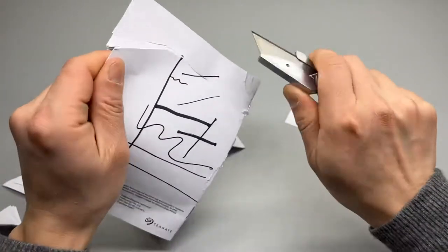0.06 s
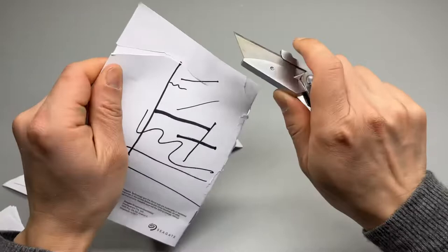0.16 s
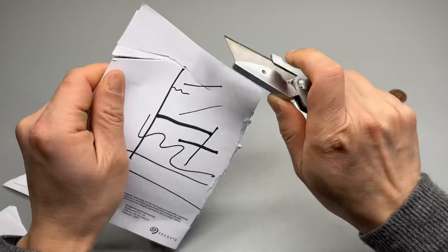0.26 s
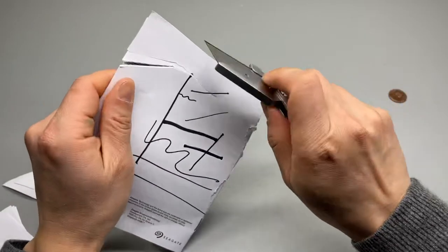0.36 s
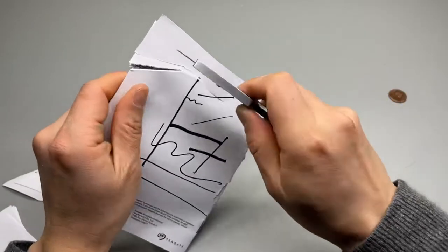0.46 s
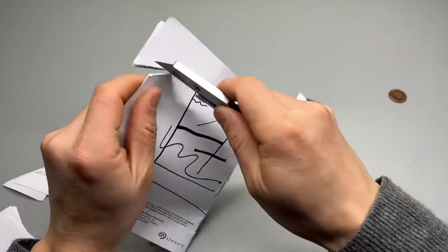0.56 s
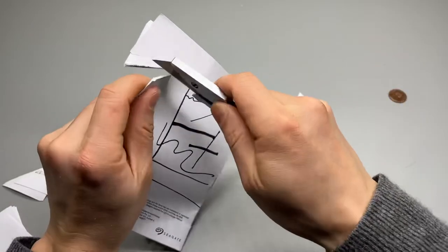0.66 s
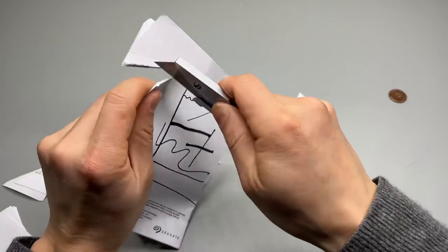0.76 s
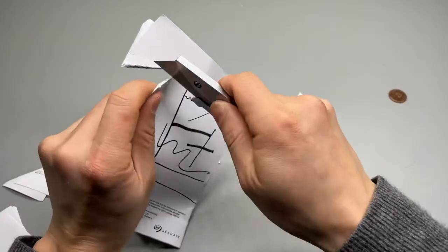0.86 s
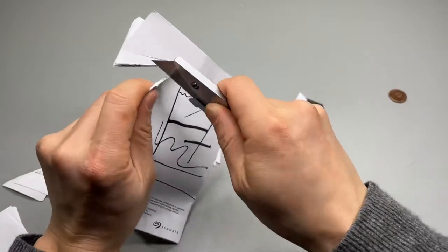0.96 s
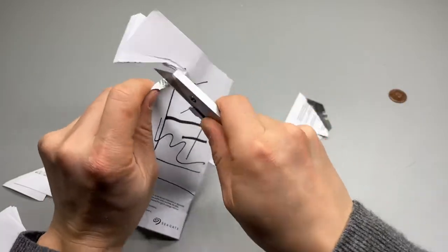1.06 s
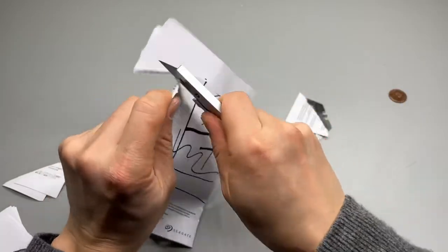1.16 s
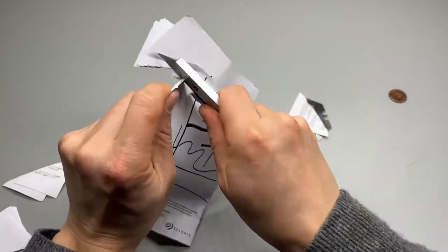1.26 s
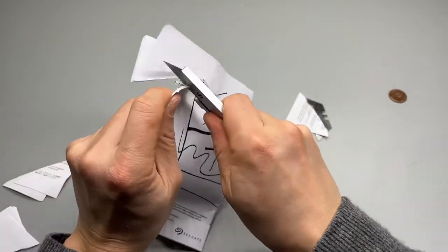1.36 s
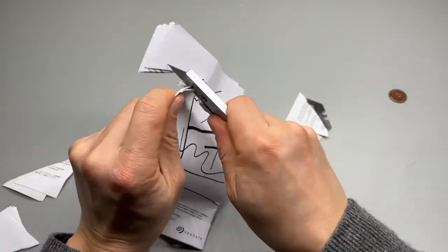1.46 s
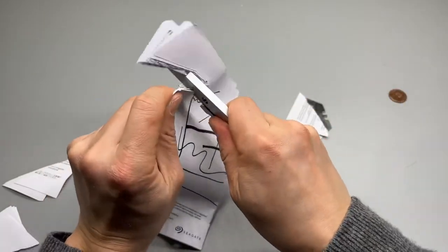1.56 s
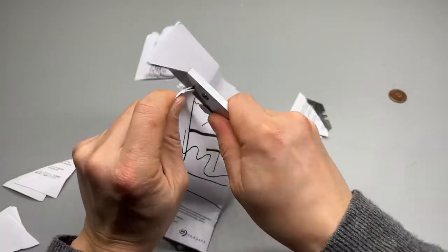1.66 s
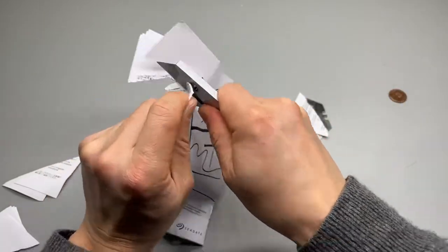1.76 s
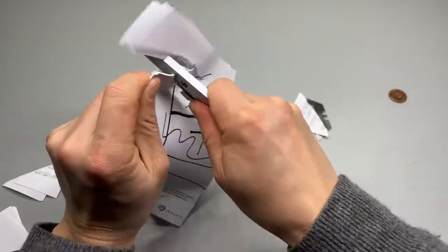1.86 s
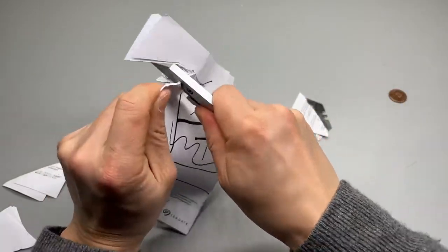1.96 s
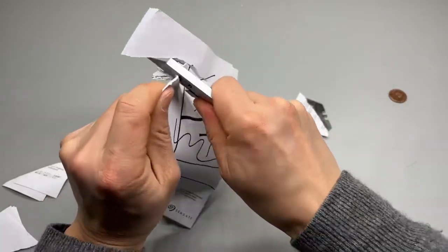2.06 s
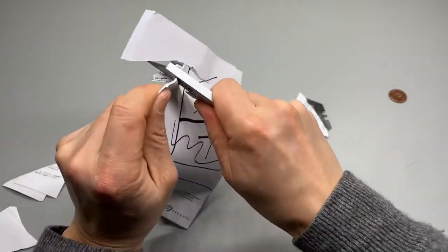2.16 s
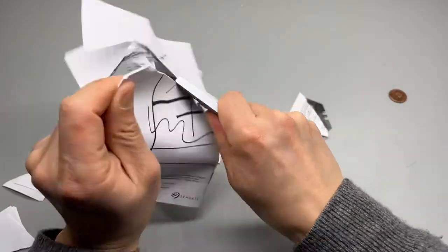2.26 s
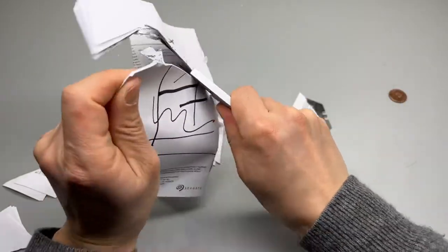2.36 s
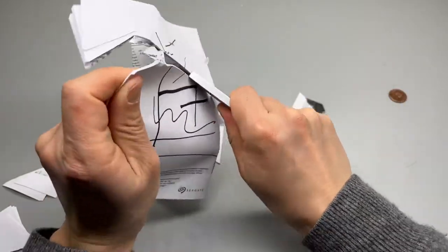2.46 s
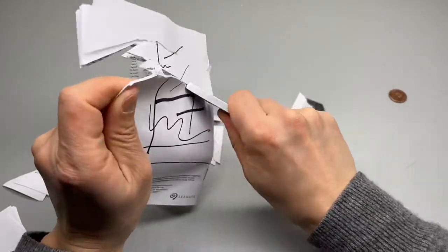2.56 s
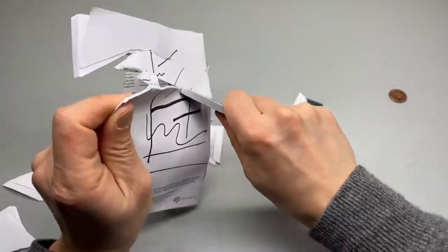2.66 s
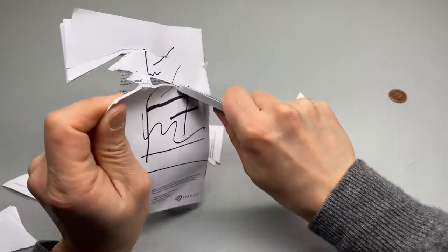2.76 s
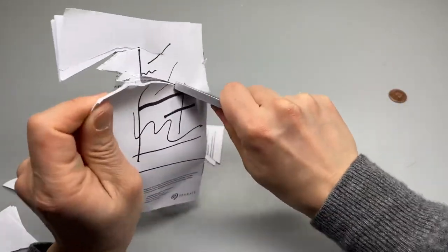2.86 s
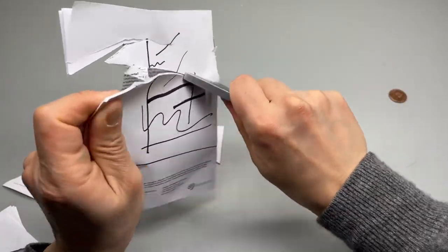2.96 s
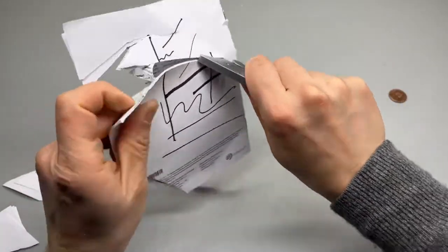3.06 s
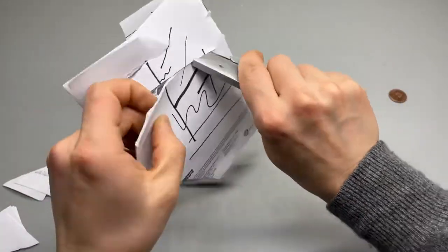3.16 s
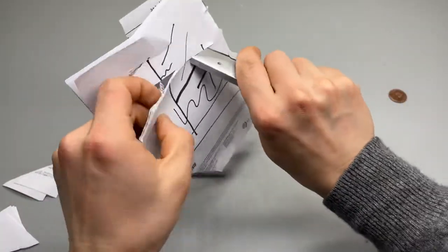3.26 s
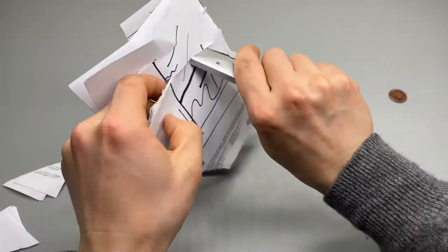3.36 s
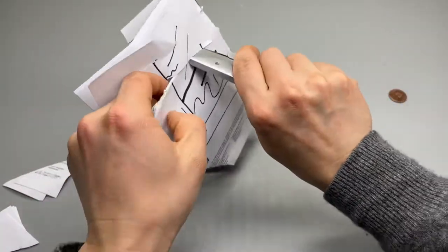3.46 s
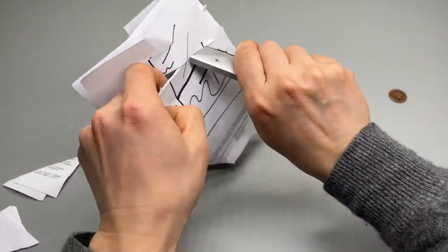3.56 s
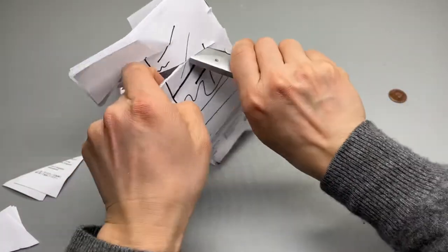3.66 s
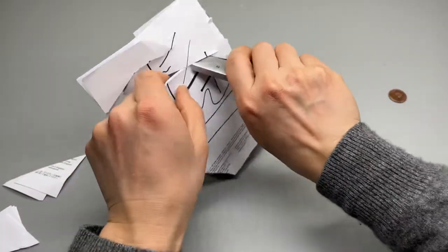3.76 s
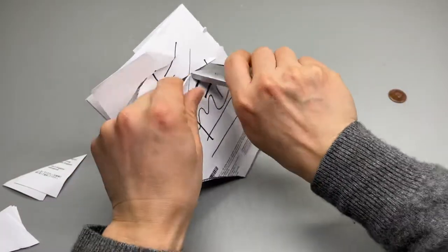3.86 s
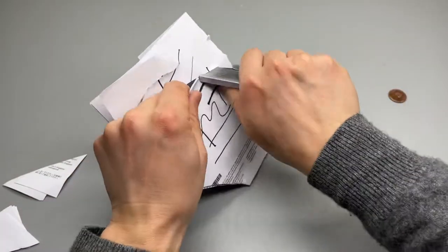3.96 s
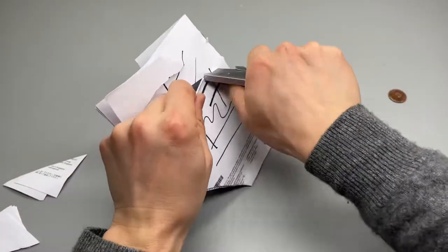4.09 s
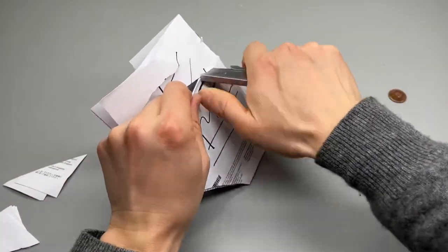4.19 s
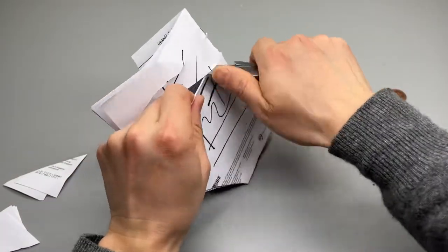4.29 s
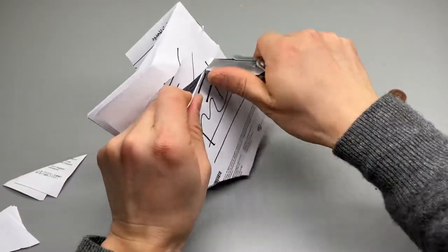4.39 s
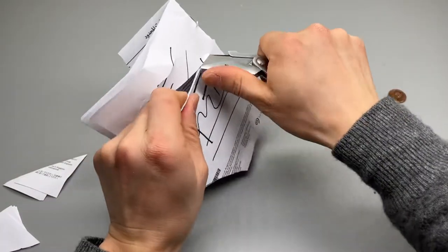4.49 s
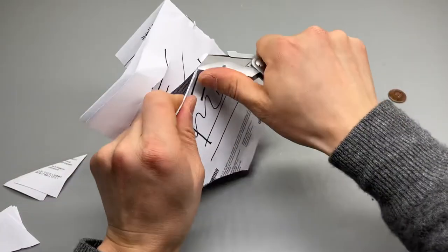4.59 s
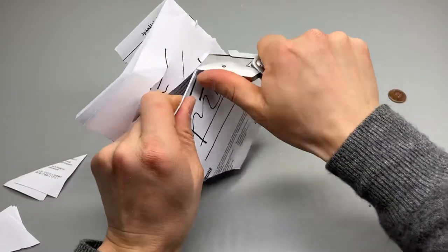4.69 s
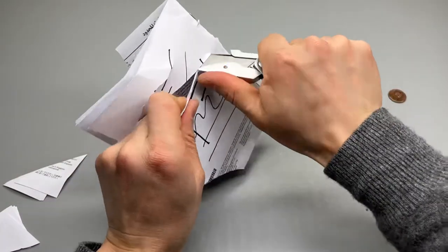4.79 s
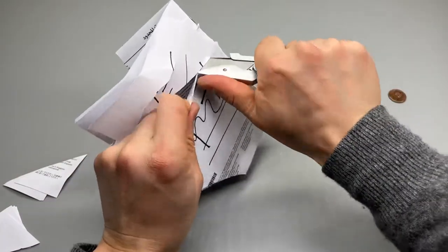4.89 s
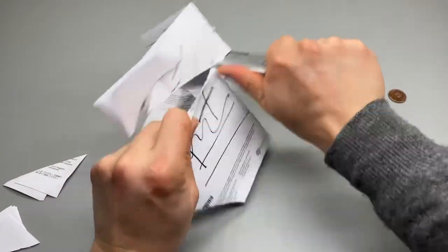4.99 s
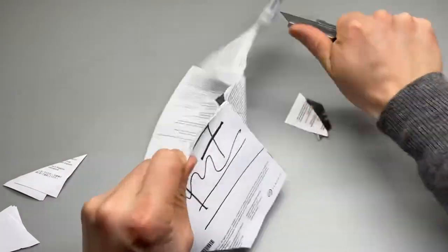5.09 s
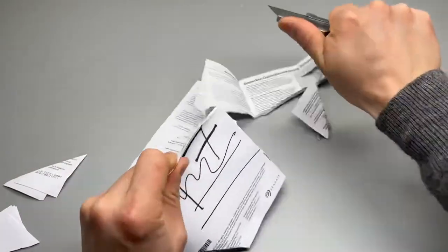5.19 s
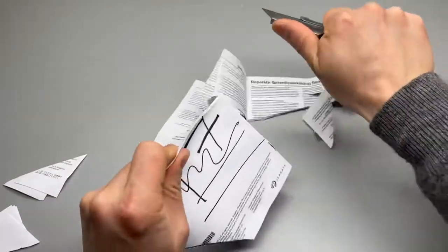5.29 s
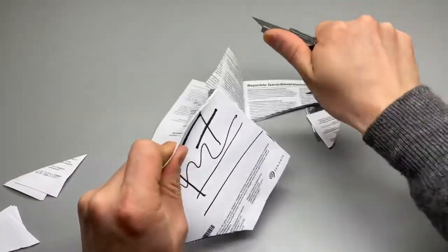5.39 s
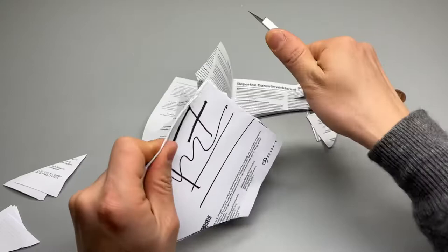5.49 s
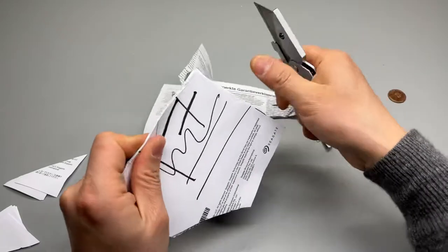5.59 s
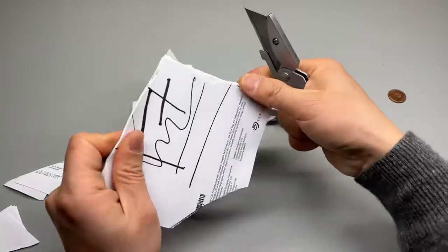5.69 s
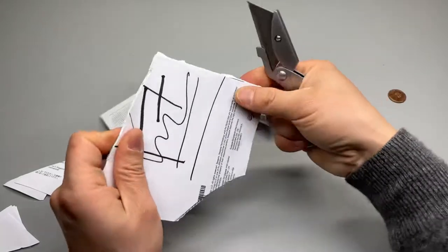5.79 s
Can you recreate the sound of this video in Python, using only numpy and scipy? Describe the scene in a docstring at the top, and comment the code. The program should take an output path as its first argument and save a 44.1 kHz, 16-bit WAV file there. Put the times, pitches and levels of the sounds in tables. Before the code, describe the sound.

A small quiet room, recorded close and in mono, with low rumble underneath. For the first second there are only very soft paper rubs, tiny ticks and dull knocks, while a faint far motor hum glides upward and disappears by about 1.7 s. At 1.1 s a short crisp slit sounds, then two or three more at 1.65 to 1.85 s with light rustling. Around 2.2 s a much stronger, bright crackling cut rips through, with sharp snaps at 2.2 and 2.3 s; a smaller snap and papery pop follow at 2.64 s. From 2.8 to 4.3 s the blade and fingers rub the sheets: hissy slides, crinkles, scattered ticks. It quietens until 4.9 s. At 5.0 s comes the loudest tear, a full-bodied rip with snaps and a soft flap of air, then another snap at 5.16 s. Brief rustles and faint handling ticks finish by 5.8 s.

```python
"""A small quiet room: a utility knife slits folded paper held over a table, close to the microphone.
Each stroke is a burst of random fibre breaks, coloured by a spectrum; between strokes blade and fingers rub
the sheets as hiss and rustle. Damped noise pulses give creases that tick and a sheet that pops dully or snaps.
The last strokes, near 5 s, are the strongest, as the strip comes free. A far motor, a gliding sine, hums
faintly at the start over low room rumble."""
import sys
import numpy as np
from scipy import signal
from scipy.fft import rfft, irfft
from scipy.io import wavfile
from scipy.ndimage import uniform_filter1d

SR = 44100
rng = np.random.default_rng(int(sys.argv[2]) if len(sys.argv) > 2 else 0)


def master_out(mix):
    """Clip the mix to full scale and print it as 16-bit PCM to the path in sys.argv[1]."""
    frames = np.transpose(np.atleast_2d(mix))
    ceiling = np.clip(frames, -1, 1)
    pcm = np.round(ceiling * 32767).astype(np.int16)
    wavfile.write(sys.argv[1], SR, pcm)


N = 257544

TIME = np.arange(N) / SR
FREQ = np.maximum(np.arange(N // 2 + 1) * SR / N, 1)


def undb(db):
    """Decibels to gain."""
    return 10 ** (np.asarray(db) / 20)


def unit(x):
    """Scale to rms 1."""
    return x / np.sqrt(np.mean(x ** 2))


def colour(x, points):
    """Give x a spectrum of (Hz, dB) points with a causal minimum-phase response; rms 1."""
    hz, db = np.transpose(points)
    log_gain = np.log(undb(np.interp(np.log(FREQ), np.log(hz), db)))
    cepstrum = irfft(log_gain, N)
    # fold onto positive time: minimum phase
    cepstrum[1:N // 2] *= 2
    cepstrum[N // 2 + 1:] = 0
    response = np.exp(rfft(cepstrum))
    return unit(irfft(rfft(x) * response, N))


def resonate(x, hz, width_hz):
    """Two-pole resonance, gain 1 at the centre."""
    w = 2 * np.pi * hz / SR
    a = np.sin(w) * width_hz / hz / 2
    return signal.lfilter([a, 0, -a], [1 + a, -2 * np.cos(w), 1 - a], x)


def resonate_twice(x, hz, width_hz):
    """Two equal resonances in series: steeper skirts."""
    return resonate(resonate(x, hz, width_hz), hz, width_hz)


def ring(x, modes):
    """Add resonances of (Hz, width Hz, dB) to x."""
    return x + sum(undb(db) * resonate(x, hz, width_hz) for hz, width_hz, db in modes)


def walk(rate_hz):
    """Smooth random wander, rms 1."""
    hold = int(SR / rate_hz)
    steps = rng.standard_normal(N)[np.arange(N) // hold]
    return unit(uniform_filter1d(steps, hold))


def grains(rate_hz, spread_db):
    """Random tiny breaks of either sign, rate_hz a second; most small, a few large; rms 1."""
    size = undb(spread_db * np.minimum(rng.exponential(size=N), 4))
    happens = rng.random(N) < rate_hz / SR
    return unit(happens * size * rng.choice([-1, 1], N))


def crinkles(rate_hz, spread_db, width, count=12):
    """Tiny facets of the paper flip at random; each rings a few cycles at one of `count` pitches."""
    pitches_hz = np.geomspace(600, 14000, count)
    power_shares = pitches_hz / pitches_hz.sum()
    total = np.zeros(N)
    for hz, share in zip(pitches_hz, power_shares):
        flips = grains(rate_hz / count, spread_db)
        total += np.sqrt(share) * unit(resonate(flips, hz, width * hz))
    return unit(total)


def room_tone():
    """Low rumble of the room under a trace of hiss: coloured noise."""
    # spectrum: (frequency [Hz], density [dB])
    tone_spectrum = [(20, -54), (38, -27), (52, -3), (90, 0), (125, 1), (180, -12.5), (400, -17),
                     (1200, -88), (16000, -66)]
    # rumble in the room: (time [s], level [dB])
    rumble = [(0, -66.5), (1.5, -64), (4.4, -69.5), (5.84, -66)]
    level_db = np.interp(TIME, *np.transpose(rumble))
    return colour(rng.standard_normal(N), tone_spectrum) * undb(level_db)


def motor(waver_db):
    """A far motor runs up and fades: a sine that climbs in pitch and wavers in level."""
    # run-up: (time [s], pitch [Hz], level [dB])
    run_up = [(0, 76.1, -72), (.4, 88.8, -66.5), (1.3, 107.7, -64), (1.7, 114, -97)]
    times, hz, db = np.transpose(run_up)
    phase = 2 * np.pi * np.cumsum(np.interp(TIME, times, hz)) / SR
    level_db = np.interp(TIME, times, db) + waver_db * walk(14)
    return unit(np.sin(phase)) * undb(level_db)


def flapping(swell_s, width):
    """The released sheet swings and fans the air: uneven low swings that swell and die quickly."""
    # swings: (start [s], level [dB], centre [Hz])
    flaps = [(1.134, -48, 123), (1.836, -48, 162), (2.206, -49, 84), (2.301, -52.5, 86), (2.637, -41, 119),
             (4.997, -29, 235), (5.005, -45, 163), (5.155, -39, 90), (5.159, -42, 256)]
    out = np.zeros(N + SR)
    t = TIME[:SR // 6]
    shape = t / swell_s * np.exp(1 - t / swell_s)
    shape_rms = np.sqrt(np.mean(shape ** 2))
    for start_s, db, hz in flaps:
        swing = resonate_twice(rng.standard_normal(len(t)), hz, width * hz) * shape
        start = int(start_s * SR)
        out[start:start + len(t)] += undb(db) * unit(swing) * shape_rms
    return out[:N]


def slide(peak_s, length_s):
    """Gain of one slide: it speeds up and slows down in a smooth bell."""
    rise_share = 0.44  # part of the slide spent speeding up
    side_s = length_s * np.where(TIME < peak_s, rise_share, 1 - rise_share)
    return np.exp(-((TIME - peak_s) / side_s) ** 2)


def bending(x, patchy_db, rate_hz, count=14):
    """As the paper bends, each half octave swells and fades by itself."""
    place = np.interp(np.log(FREQ), np.log([200, 14000]), [0, count - 1])
    spectrum = rfft(x)
    knots = np.arange(0, TIME[-1] + 1, 1 / rate_hz)
    out = np.zeros(N)
    for k in range(count):
        gain = np.interp(TIME, knots, undb(patchy_db * rng.standard_normal(len(knots))))
        band = irfft(spectrum * np.maximum(1 - abs(place - k), 0), N)
        out += gain * band
    return out


def rubbing():
    """Rough paper sticks and slips: fine hiss, stray crinkles and a lower rustle as the sheet bends."""
    # steady rub of the grip: (time [s], hiss level [dB], flexing level [dB])
    grip = [(0, -65, -84), (.2, -61, -78.5), (.52, -66, -77), (.6, -56.5, -56.5), (.88, -61, -92),
            (1.21, -56.5, -55), (1.5, -58, -83), (1.74, -43.5, -48), (2.07, -60.5, -66),
            (2.291, -49, -45.5), (2.76, -66, -75), (3.3, -52, -52.5), (3.48, -50.5, -61.5),
            (3.76, -45.5, -50), (4.359, -67.5, -78), (4.6, -56.5, -63.5), (4.86, -57, -74),
            (5.14, -38, -38), (5.36, -65, -64.5), (5.469, -55, -83), (5.601, -53.5, -63)]
    # single slides of blade or fingers: (fastest at [s], length [s], hiss level [dB], flexing level [dB])
    slides = [(.005, 0.032, -55, -79), (0.086, 0.044, -53.5, -87), (0.362, 0.036, -58.5, -56.5),
              (0.739, 0.043, -61.5, -56.5), (0.949, 0.069, -56, -49), (1.051, 0.072, -53, -52.5),
              (1.33, 0.11, -50, -49), (1.383, 0.025, -44, -49.5), (1.629, 0.11, -58, -50),
              (1.89, 0.08, -48, -47), (1.991, 0.059, -44.5, -53.5), (2.106, 0.038, -50, -59.5),
              (2.522, 0.068, -44, -45.5), (2.623, 0.2, -47, -49), (2.804, 0.049, -49.5, -49.5),
              (2.876, 0.077, -50.5, -50.5), (2.933, 0.035, -41, -42), (2.983, 0.14, -47, -47.5),
              (3.08, 0.07, -43.5, -77), (3.181, 0.11, -44, -53), (3.264, 0.018, -55, -43.5),
              (3.295, 0.045, -43.5, -71), (3.57, 0.091, -41, -59.5), (3.63, 0.031, -42, -62),
              (3.878, 0.032, -48, -47), (3.962, 0.095, -42.5, -47.5), (4.022, 0.048, -49, -47.5),
              (4.123, 0.065, -47.5, -49.5), (4.222, 0.15, -56, -57.5), (4.4, 0.02, -56, -83),
              (4.688, 0.12, -50, -56.5), (5.223, 0.016, -32.5, -53), (5.505, 0.03, -45.5, -62),
              (5.818, 0.027, -39, -52)]
    # spectra: (frequency [Hz], density [dB])
    hiss_spectrum = [(400, -17.5), (1300, -8), (2100, 2), (3200, 1), (5000, 2), (9000, 2), (12000, -4.5),
                     (16000, -6.5)]
    flex_spectrum = [(40, -10), (110, 1.5), (200, -0.5), (450, 1.5), (1000, -2), (1600, -2.5), (3000, -4.5),
                     (9000, -26)]
    times, grip_hiss_db, grip_flex_db = np.transpose(grip)
    hiss_gain = undb(np.interp(TIME, times, grip_hiss_db))
    flex_gain = undb(np.interp(TIME, times, grip_flex_db))
    for peak_s, length_s, hiss_db, flex_db in slides:
        speed = slide(peak_s, length_s)
        hiss_gain = np.hypot(hiss_gain, undb(hiss_db) * speed)
        flex_gain = np.hypot(flex_gain, undb(flex_db) * speed)
    slip = undb(1.6 * walk(130))
    facets = crinkles(rate_hz=1100, spread_db=2.0, width=0.25) * undb(-3.5)
    hiss = colour(grains(14000, 1.4) + facets, hiss_spectrum)
    flex = colour(grains(2500, 4.8) + facets, flex_spectrum)
    rub = (hiss * hiss_gain + flex * flex_gain) * slip
    return bending(rub, patchy_db=2.2, rate_hz=40)


def buckles(events, rattle, rattle_s, thump_db, thump_hz):
    """A patch of paper flips: a damped pulse, a short rattle of the layers and a thump of pushed air."""
    out = np.zeros(N + SR)
    t = TIME[:SR // 8]
    for start_s, db, hz, width in events:
        push = rattle * np.exp(-t / rattle_s) * rng.standard_normal(len(t))
        push[0] += 1
        crack = resonate_twice(push, hz, width * hz)
        thump = resonate_twice(push, thump_hz, 2 * thump_hz)
        sound = unit(crack) + undb(thump_db) * unit(thump)
        # the level is that of the first hundredth of a second
        sound *= undb(db) / np.sqrt(np.mean(sound[:SR // 100] ** 2))
        start = int(start_s * SR)
        out[start:start + len(t)] += sound
    return out[:N]


def popping():
    """A wide bulge of the sheet buckles with a dull knock, too slowly to make any treble."""
    # knocks: (start [s], level [dB], centre [Hz], bandwidth / centre)
    pops = [(0.473, -58.5, 910, 0.4), (0.556, -55.5, 630, 0.76), (1.843, -36.5, 634, 0.43),
            (2.637, -32.5, 1440, 1.4), (2.888, -44, 477, 4.5), (3.007, -41, 1100, 18), (4.126, -42, 706, 3),
            (4.457, -42, 910, 1.14), (4.726, -54.5, 1530, 3.6), (5.274, -46, 1070, 1.1),
            (5.504, -45, 1350, 2.4), (5.772, -46, 1050, 1.3)]
    knocks = buckles(pops, rattle=0.057, rattle_s=0.015, thump_db=-6.5, thump_hz=410)
    return signal.sosfilt(signal.butter(6, 1700, fs=SR, output="sos"), knocks)


def ticking():
    """Creases give way and the blade catches an edge: small damped pulses."""
    # ticks: (start [s], level [dB], centre [Hz], bandwidth / centre)
    ticks = [(0.314, -55.5, 2550, 1.9), (0.338, -51, 2590, 1.5), (1.091, -43, 10500, 1.2),
             (1.126, -34, 7000, 3.4), (1.361, -49, 8500, 2.6), (1.425, -46, 6000, 14),
             (1.435, -47.5, 8000, 1.3), (1.467, -47, 8900, 1.8), (1.522, -45, 3530, 0.74),
             (1.719, -40, 3250, 10), (1.877, -36.5, 3260, 3.6), (2.303, -25.5, 5700, 0.71),
             (2.385, -38.5, 7000, 0.89), (2.448, -42.5, 4340, 3.5), (2.594, -39.5, 7550, 3.2),
             (2.624, -45, 2500, 4), (2.922, -44, 2450, 0.88), (3.212, -38.5, 6350, 3.3),
             (3.319, -35.5, 8700, 1.9), (3.346, -32.5, 8800, 1.6), (3.452, -50, 10000, 1.5),
             (3.626, -40.5, 4550, 3.6), (3.678, -41, 3000, 3), (3.72, -37.5, 4200, 5.5),
             (3.753, -47, 2920, 0.29), (3.824, -40.5, 4470, 1), (3.849, -42.5, 10900, 3.6),
             (3.868, -46.5, 2600, 6), (4.296, -58, 4000, .8), (4.543, -61, 10400, 0.1),
             (4.561, -47, 5940, 9), (4.562, -49.5, 10450, 0.088), (4.643, -43.5, 4740, 0.72),
             (4.714, -52, 10450, 0.1), (4.875, -48.5, 7900, 5.7)]
    return buckles(ticks, rattle=0.14, rattle_s=0.004, thump_db=-14.5, thump_hz=1000)


def snapping():
    """A tough bunch of fibres parts or the taut sheet snaps over: sharp damped pulses."""
    # snaps: (start [s], level [dB], centre [Hz], bandwidth / centre)
    snaps = [(1.655, -30.5, 10100, 1.2), (2.197, -26.5, 1760, 0.56), (2.199, -21.5, 9500, 0.81),
             (2.306, -18, 3430, 2.6), (2.309, -19.5, 4600, 0.65), (2.636, -29.5, 1750, 5.6),
             (2.645, -29.5, 3150, 2.4), (4.996, -28, 8000, 1.5), (5.004, -14.5, 3030, 1.9),
             (5.012, -19, 2630, 0.89), (5.029, -20, 3160, 0.72), (5.159, -17, 3020, 3.5),
             (5.161, -19.5, 6870, 0.24), (5.165, -25.5, 2800, 2.6)]
    return buckles(snaps, rattle=0.13, rattle_s=0.0062, thump_db=-14.0, thump_hz=845)


def stroke(bite_s, attack_s, hold_s, release_s):
    """Gain of one stroke: the edge bites, runs on with sagging force and lets go."""
    edge_db, sag_db_per_s = 27.5, 99  # change over one attack or release; weakening during the hold
    early = np.maximum(bite_s - TIME, 0) / attack_s
    late = np.maximum(TIME - bite_s - hold_s, 0) / release_s
    sag_db = sag_db_per_s * np.clip(TIME - bite_s, 0, hold_s)
    return undb(-edge_db * (early + late) - sag_db)


def slicing():
    """The edge breaks fibres in uneven bunches; the tugs also shake the whole sheet."""
    # strokes: (full bite at [s], attack [s], hold [s], release [s], crackle level [dB], body level [dB])
    strokes = [(1.108, 0.028, 0.004, 0.074, -36, -41.5), (1.13, 0.0069, 0.035, 0.026, -31, -35),
               (1.654, 0.013, 0.033, 0.037, -33, -38.5), (1.689, 0.012, .003, 0.048, -27.5, -29.5),
               (1.838, 0.051, 0.0014, 0.025, -29.5, -35), (2.178, 0.008, 0.023, 0.03, -18.5, -36.5),
               (2.204, 0.0091, 0.045, 0.024, -20.5, -28), (4.974, 0.011, .02, 0.049, -18.5, -36),
               (4.994, 0.021, 0.048, 0.064, -16, -16)]
    # spectra of fibres and whole sheet: (frequency [Hz], density [dB])
    fibre_spectrum = [(300, -2), (1500, -3), (4000, 2.5), (8000, 5), (10000, 5), (12500, 0.5),
                      (16000, -0.5)]
    body_spectrum = [(40, -19), (80, -10), (200, -3.5), (400, -7.5), (900, 0), (2800, -1), (5000, -3.5),
                     (9000, -8), (16000, -33)]
    body_lag_s = 0.0033  # the whole sheet answers a little after the fibres
    crackle_gain, body_gain = np.zeros(N), np.zeros(N)
    for bite_s, attack_s, hold_s, release_s, crackle_db, body_db in strokes:
        fibre_force = stroke(bite_s, attack_s, hold_s, release_s)
        body_force = stroke(bite_s + body_lag_s, attack_s, hold_s, release_s)
        crackle_gain = np.maximum(crackle_gain, undb(crackle_db) * fibre_force)
        body_gain = np.maximum(body_gain, undb(body_db) * body_force)
    bunches = undb(1.3 * walk(500))
    facets = crinkles(rate_hz=2200, spread_db=2.3, width=0.35) * undb(-3)
    crackle = colour((grains(14000, 0.99) + facets) * bunches, fibre_spectrum)
    body = colour(grains(9000, 4.1) * bunches, body_spectrum)
    return crackle * crackle_gain + body * body_gain


def sheet(x):
    """Bending waves cross the paper treble first and ring its few damped resonances."""
    # resonances of the held sheet: (centre [Hz], width [Hz], level [dB])
    sheet_modes = [(1825, 210, -8.5), (2860, 1330, -9)]
    bend_lag_s = 0.00132  # travel time across the sheet at 1 kHz
    turns = 2 * bend_lag_s * np.sqrt(1000 * FREQ)
    dispersed = irfft(rfft(x) * np.exp(-2j * np.pi * turns), N)
    return undb(-1.5) * ring(dispersed, sheet_modes)


def surroundings(x):
    """The table and the room around it add longer rings."""
    # resonances: (centre [Hz], width [Hz], level [dB])
    room_modes = [(250.7, 7, -2.5), (457.2, 5.9, 1), (783, 10, 3.5), (1013, 70, -2.5)]
    return ring(x, room_modes)


def room(x, near_db, near_t60_s, far_db, far_t60_s, damp_hz, count=48):
    """Quick scatter from table and hands, then a faint dull tail; the paths change as the paper moves."""
    t = TIME[:SR // 3]
    hop = N // count + 1
    window = signal.windows.cosine(2 * hop)
    dull = signal.butter(1, damp_hz, fs=SR)
    padded = np.pad(x, (hop, 2 * hop))
    out = np.zeros(N + 3 * hop + len(t))
    # overlapping stretches, each with its own random echoes
    for start in range(0, N + hop, hop):
        near, far = rng.standard_normal((2, len(t)))
        near *= undb(-60 * t / near_t60_s) * (t > 0.001)
        far = signal.lfilter(*dull, far) * undb(-60 * t / far_t60_s) * (t > 0.008)
        echoes = (undb(near_db) * unit(near) + undb(far_db) * unit(far)) / np.sqrt(len(t))
        wet = signal.fftconvolve(padded[start:start + 2 * hop] * window, echoes)
        out[start:start + len(wet)] += wet
    return (x + out[hop:hop + N]) / np.sqrt(1 + undb(near_db) ** 2)


def scene():
    """Rubbing, buckles and cuts sound through the sheet into the room."""
    touches = rubbing() + popping() + ticking() + snapping() + slicing()
    paper = sheet(touches) + flapping(swell_s=0.012, width=0.4)
    heard = room(surroundings(paper), near_db=-7.5, near_t60_s=0.068,
                 far_db=-20, far_t60_s=0.38, damp_hz=5940)
    return (room_tone() + motor(waver_db=0.5) + heard)[None]


def record(dry):
    """The microphone loses the deepest bass and rounds the highest peaks; a steep filter cuts the top."""
    low_cut_hz, top_hz = 42, 15750
    thinned = signal.sosfilt(signal.butter(3, low_cut_hz, "high", fs=SR, output="sos"), dry)
    rounded = np.tanh(thinned)
    return signal.sosfilt(signal.ellip(10, 0.2, 70, top_hz, fs=SR, output="sos"), rounded)


dry = scene()
out = record(dry)
master_out(out)
```